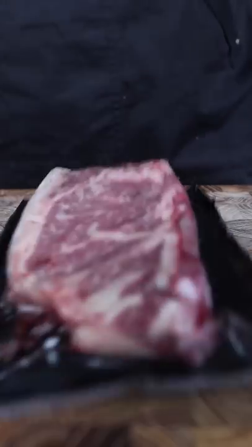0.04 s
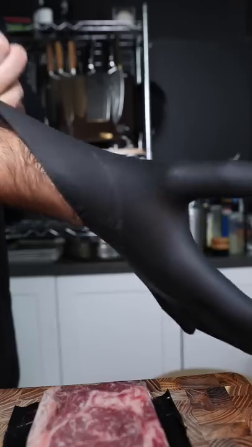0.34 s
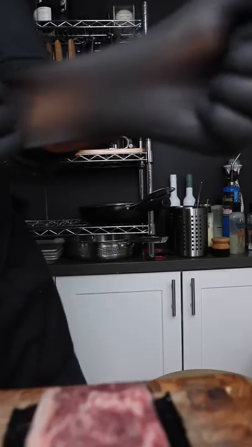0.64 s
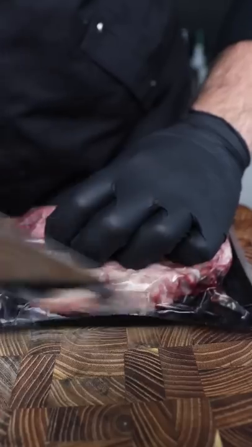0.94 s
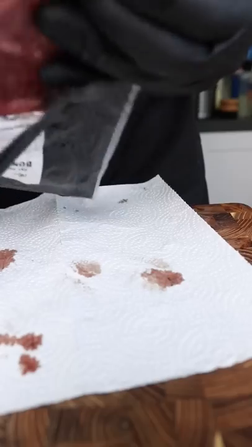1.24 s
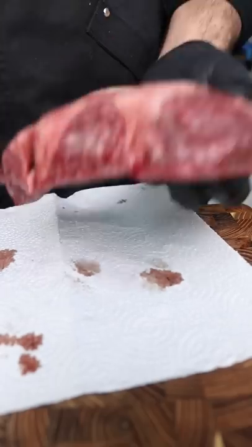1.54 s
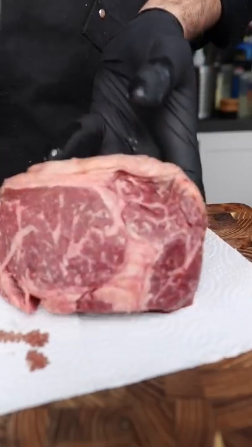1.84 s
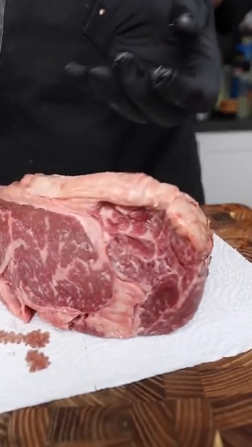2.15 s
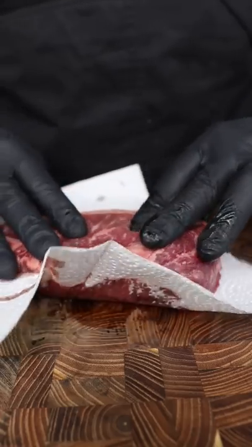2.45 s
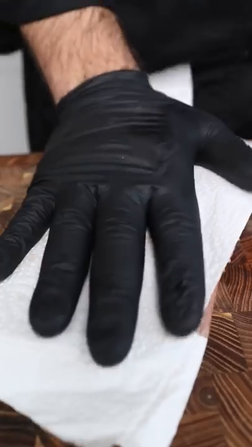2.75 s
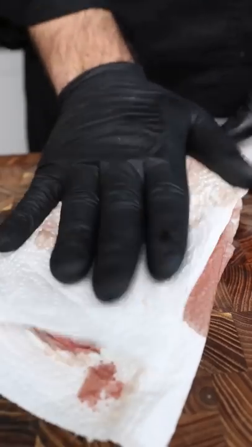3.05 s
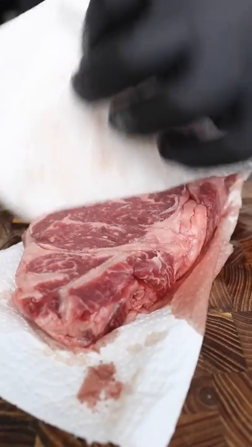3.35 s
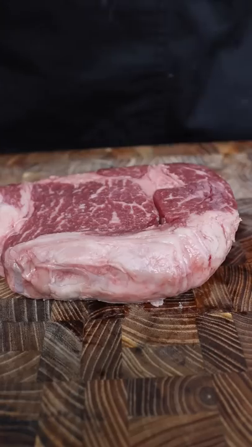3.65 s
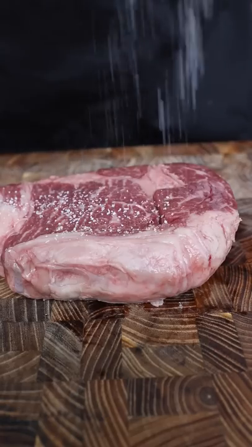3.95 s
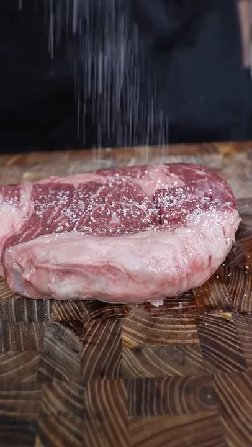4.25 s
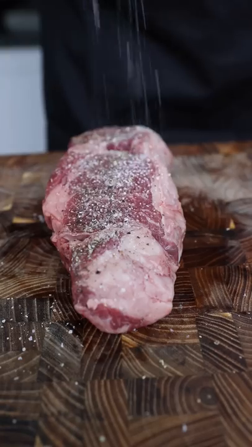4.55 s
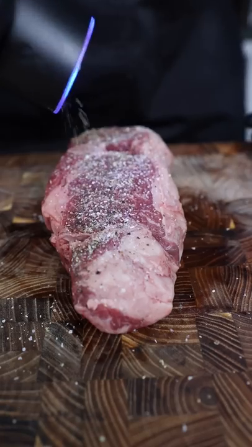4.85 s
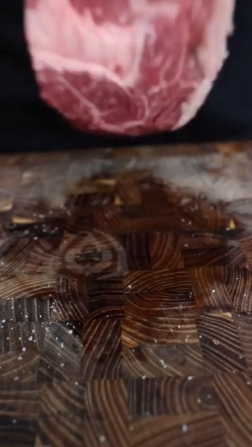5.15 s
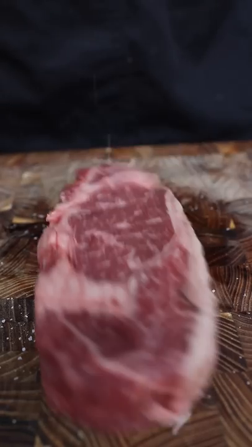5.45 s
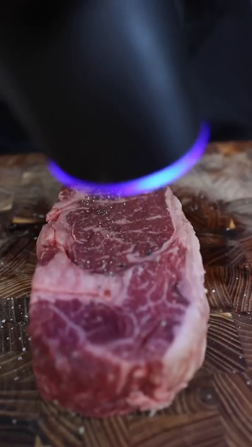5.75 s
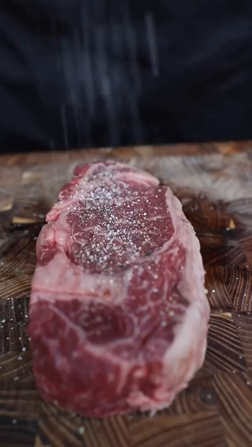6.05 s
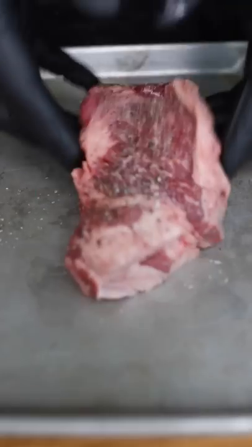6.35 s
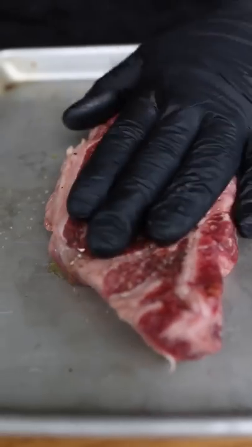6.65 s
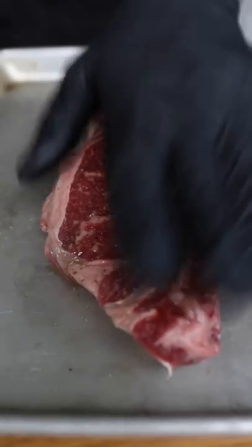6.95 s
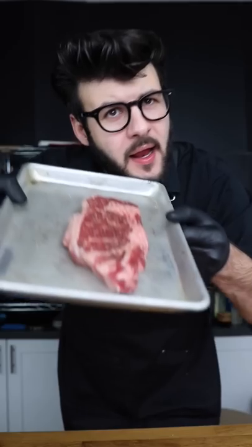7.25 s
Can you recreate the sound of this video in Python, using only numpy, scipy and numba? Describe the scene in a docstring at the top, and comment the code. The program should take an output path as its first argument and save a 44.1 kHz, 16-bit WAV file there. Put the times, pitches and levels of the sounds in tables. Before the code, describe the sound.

Close kitchen handwork: meat smacks a board, rubber snaps, plastic tears, a pepper mill crunches twice, and the meat is patted on metal.

```python
"""A steak is prepared close by in a small kitchen, in short shots joined by hard cuts, over a fridge's hum.
First it slaps onto a wooden board and excites the board's modes. A rubber glove snaps on, the vacuum bag
is slit, and the wet meat peels out. Paper towel pats it dry with a rustle of friction, salt falls in tiny
impacts, and an electric pepper mill grinds twice, its housing resonating to the fractures.
Last, the meat is laid on a metal tray and patted three times, so that the tray rings."""
import sys
import numpy as np
from scipy import signal
from scipy.fft import rfft, irfft, next_fast_len
from scipy.io import wavfile
from numba import njit

SR = 44100
rng = np.random.default_rng(int(sys.argv[2]) if len(sys.argv) > 2 else 0)


def wav_record(signal):
    """Record a signal, one row per channel, as 16-bit PCM in the file named by sys.argv[1]."""
    frames = np.transpose(np.atleast_2d(signal))
    bounded = np.clip(frames, -1, 1)
    # unit amplitude maps onto the largest positive 16-bit level
    quanta = np.round(bounded * 32767).astype(np.int16)
    wavfile.write(sys.argv[1], SR, quanta)


N = 331023
T = np.arange(N) / SR

# shot boundaries (time [s])
CUT_TIMES = [0, .46, 2.19, 2.552, 5.018, 6.02, 6.704, 7.105, 7.6]
# rubber and plastic film snapping (time [s], level [dB], length [s], tilt [dB/octave])
FILM_SNAPS = [(0.2406, -17, 0.00039, 8.5), (0.677, -40.5, 0.0017, -3.5), (0.7182, -18.5, .001, -2),
              (0.7208, -6, .0012, -3.5), (0.7238, -5, .0013, 2.5), (0.8877, -13, 0.00038, 4.5),
              (0.9292, -13, 0.00081, 5), (0.959, -23, 0.00086, 15), (1.012, -21.5, 0.0011, 6.5),
              (1.131, -35, 0.0016, -2), (1.4897, -34, 0.001, -0.5)]


def amp(db):
    """Amplitude ratio of a level in decibels."""
    return 10 ** (np.asarray(db) / 20)


def unit(x):
    """Normalisation to an rms of 1."""
    return x / np.sqrt(np.mean(x ** 2) + 1e-20)


def add(out, start_s, x):
    """Superposition: x is added into out from a given time."""
    i = int(round(start_s * SR))
    x = x[max(-i, 0):N - i]
    out[max(i, 0):max(i, 0) + len(x)] += x


def in_shot(s, x):
    """Truncation: a sound that starts at time s ends no later than the next cut."""
    next_cut = min(cut for cut in CUT_TIMES if cut > s)
    return x[:int((next_cut - s) * SR)]


def strokes(rows, attack_s, release_s):
    """Incoherent sources add in power: the joint envelope of movements that swell, hold and decay."""
    power = np.zeros(N)
    for s, length_s, db in rows:
        release = np.exp(-np.clip((T - length_s) / release_s, 0, 20))
        gain = amp(db) * np.minimum(T / attack_s, 1) * release
        add(power, s, in_shot(s, gain ** 2))
    return np.sqrt(power)


def colour(x, points, tilt_db=0):
    """Minimum-phase filter through (frequency [Hz], gain [dB]) points, tilted per octave; output rms 1."""
    size = 2 * next_fast_len(len(x) // 2 + 1)
    octave = np.log2(np.maximum(np.fft.rfftfreq(size, 1 / SR), 1))
    hz, db = np.transpose(points)
    octaves_outside = np.abs(octave - np.clip(octave, np.log2(hz[0]), np.log2(hz[-1])))
    tilt = tilt_db * np.maximum(octave - np.log2(hz[1]), 0)
    gain_db = np.interp(octave, np.log2(hz), db) + tilt - 20 * octaves_outside
    cepstrum = irfft(gain_db * np.log(10) / 20)
    cepstrum[1:size // 2] *= 2  # folding the cepstrum makes the filter causal
    cepstrum[size // 2 + 1:] = 0
    return unit(irfft(rfft(x, size) * np.exp(rfft(cepstrum)))[:len(x)])


def grains(per_s, spread_db, bed):
    """Shot noise: random clicks of very unequal size over a bed of smooth friction noise."""
    sizes = amp(spread_db * np.minimum(rng.exponential(size=N), 4))
    clicks = (rng.random(N) < per_s / SR) * sizes * rng.choice([-1, 1], N)
    return unit(unit(clicks) + bed * rng.standard_normal(N))


@njit
def resonate(x, hz, damping):
    """Driven damped oscillator: a band-pass whose centre may move; damping is bandwidth over centre."""
    y, band_state, low_state = np.empty(len(x)), 0., 0.
    for i in range(len(x)):
        g = np.tan(np.pi * hz[i] / SR)
        y[i] = (band_state + g * (x[i] - low_state)) / (1 + g * (g + damping))
        band_state = 2 * y[i] - band_state
        low_state += 2 * g * y[i]
    return y


def reflections(x, ring_s, ring_db):
    """Interference with close reflections and dense short resonances ripples the spectrum."""
    t = np.arange(2048) / SR
    ring = rng.standard_normal(len(t)) * np.exp(-t / ring_s)
    return unit(x + amp(ring_db) * signal.fftconvolve(x, ring / np.linalg.norm(ring))[:len(x)])


def room_tail():
    """Diffuse field: the kitchen's impulse response is noise decaying at its own rate in each band."""
    # (frequency [Hz], decay time T60 [s], level [dB])
    bands = [(101.14, 1, -12), (300, 0.14, -3.5), (900, .42, -10), (2500, 0.35, -13), (6500, 0.38, -13),
             (12800, 0.25, -16)]
    t = np.arange(SR // 2) / SR
    octave = np.log2(np.maximum(np.fft.rfftfreq(len(t), 1 / SR), 1))
    hz, t60s, dbs = np.transpose(bands)
    noise, tail = rfft(rng.standard_normal(len(t))), 0
    for share, t60, db in zip(np.eye(len(hz)), t60s, dbs):
        band = irfft(noise * np.interp(octave, np.log2(hz), share), len(t))
        decay = np.exp(-np.log(1000) * t / t60) * (1 - np.exp(-t / 0.00048))
        tail = tail + amp(db) * band * decay / np.linalg.norm(decay)
    return tail


def burst(length_s, spectrum, tilt_db, fizz_db, fizz_s, room_db):
    """Air expelled between closing surfaces: a noise pulse, fizz and tail. Returns lead time and sound."""
    lead_s = 4 * length_s
    t = np.arange(SR // 2) / SR - lead_s
    width = np.where(t < 0, .7, 1) * length_s
    shape = np.exp(-(t / width) ** 2 / 2) + amp(fizz_db) * (t > 0) * np.exp(-np.abs(t) / fizz_s)
    puff = colour(shape * rng.standard_normal(len(t)), spectrum, tilt_db)
    tail = colour(room_tail(), spectrum, tilt_db)
    tail = np.pad(tail, (int(lead_s * SR), 0))[:len(t)]
    return lead_s, (puff + amp(room_db) * tail) * np.sqrt(np.mean(shape ** 2))


def impacts(rows, spectrum, modes, settle_s, fizz_db, wobble_db, wobble_s, room_db):
    """Impact excitation: a smack, then the soft weight wobbles and rings the modes of the body below."""
    # wobbling meat (frequency [Hz], gain [dB])
    flesh = [(45, -2), (95, -10), (150, -2), (200, 2), (400, -0.5), (700, -13.5), (1200, -18.5),
             (2500, -29)]
    out, t = np.zeros(N), np.arange(SR // 2) / SR
    hz, db, t60 = np.transpose(modes)[:, :, None]
    decay = np.exp(-np.log(1000) * t / t60)
    for s, smack_db, contact_s, tilt_db, thud_db, thud_hz in rows:
        lead_s, smack = burst(contact_s, spectrum, tilt_db, fizz_db, fizz_s=0.0065, room_db=room_db)
        add(out, s - lead_s, in_shot(s, amp(smack_db) * smack))
        # modes near the thud's centre are driven hardest
        share = amp(db + 10.4 * np.exp(-(np.log2(hz / thud_hz) / 0.25) ** 2))
        detune = 1 + .015 * rng.standard_normal(hz.shape)
        phase = 2 * np.pi * (hz * detune * t + rng.random(hz.shape))
        ring = np.sum(share * np.sin(phase) * decay, axis=0) / np.linalg.norm(share)
        wobble = amp(wobble_db) * colour(rng.standard_normal(len(t)), flesh) * np.exp(-t / wobble_s)
        onset = 1 - np.exp(-t / settle_s)
        add(out, s, in_shot(s, 2 * amp(thud_db) * (ring + wobble) * onset))
    return out


def board():
    """Damped modes of a wooden board, excited as wet meat meets it or a hand meets the meat."""
    # (time [s], smack level [dB], contact [s], tilt [dB/octave], thud level [dB], thud centre [Hz])
    slaps = [(.0078, -8.5, 0.0016, 0.5, -17.5, 380), (.0148, -7.5, 0.0022, 1.5, -26, 204),
             (.0252, -5.5, 0.0016, 1, -39, 400), (.039, -47.5, 0.0027, 3.5, -30, 398),
             (2.745, -38.5, 0.0096, -0.5, -47, 200), (3.058, -24.5, 0.003, -1.5, -43, 132),
             (3.687, -37.5, 0.0032, -6, -40.5, 283), (3.721, -45, 0.0084, 2.5, -55, 505),
             (5.414, -51, 0.0026, 1, -44, 169), (5.421, -33, 0.00077, 0.5, -45.5, 200),
             (5.478, -45, 0.02, 7.5, -45, 170)]
    # (frequency [Hz], gain [dB])
    smack_spectrum = [(60, -15.5), (200, 3), (700, 3.5), (1500, 3.5), (3000, -1.5), (5500, -4.5),
                      (8500, -3), (10500, -11.5), (15000, -15.5)]
    # (frequency [Hz], relative level [dB], decay time T60 [s])
    wood_modes = [(60.5, -1, 0.1), (124.8, -7, 0.35), (172.8, -2, 0.17), (224, -7, .15), (295, -5.5, 0.12),
                  (424, -6.5, 0.074), (638, -10.5, 0.051), (747, -2.5, .1), (1113, -7, 0.1)]
    return impacts(slaps, smack_spectrum, wood_modes, settle_s=0.001, fizz_db=-27,
                   wobble_db=-12, wobble_s=0.061, room_db=-7)


def counter():
    """Forced vibration: the counter sways at low frequency when weight comes down on it."""
    # (time [s], length [s], level [dB])
    loads = [(0, 0.079, -39.5), (.19, 0.012, -47), (2.745, 0.041, -41), (3.04, 0.054, -35.5),
             (5.41, .08, -54), (5.51, .04, -41), (5.62, 0.11, -45), (6.35, 0.18, -48.5), (6.515, .05, -42),
             (6.77, 0.058, -44), (6.99, .06, -40.5)]
    # (frequency [Hz], gain [dB])
    sway_spectrum = [(14, 8), (24, -1), (34, 11), (45, -5.5), (60, -14.5), (100, -19.5), (200, -22)]
    sway = colour(rng.standard_normal(N), sway_spectrum)
    return sway * strokes(loads, attack_s=0.0056, release_s=0.066)


def air_and_fridge():
    """Broadband room noise under the wavering line spectrum of a fridge, both fainter in the last shot."""
    # (frequency [Hz], gain [dB])
    air_spectrum = [(25, -13), (55, -2.5), (90, -15), (200, -15.5), (310, -11), (420, -19), (520, -17),
                    (800, -21), (1600, -27), (3000, -32.5), (8000, -33.5), (15500, -44)]
    # (frequency [Hz], level [dB])
    fridge_tones = [(59.2, -62.5), (310, -63.5), (415, -63)]
    hum = 0
    for hz, db in fridge_tones:
        waver = unit(resonate(rng.standard_normal(N), np.full(N, 1. * hz), damping=8 / hz))
        hum = hum + amp(db) * (np.sin(2 * np.pi * hz * T) + .3 * waver)
    air = colour(rng.standard_normal(N), air_spectrum) * amp(-60.5)
    return (air + hum) * np.where(T > CUT_TIMES[-2], amp(-12), 1)


def snaps():
    """Sudden release of tension: taut film lets go in a broadband pulse of a millisecond or two."""
    # (frequency [Hz], gain [dB])
    film_spectrum = [(60, -21.5), (170, -8.5), (330, 4), (900, 1), (1800, 4), (3200, 2.5), (5500, 1),
                     (8000, -0.5), (10500, -11), (15000, -13)]
    out = np.zeros(N)
    for s, db, length_s, tilt_db in FILM_SNAPS:
        lead_s, crack = burst(length_s, film_spectrum, tilt_db, fizz_db=-20, fizz_s=0.0081, room_db=-8.5)
        add(out, s - lead_s, in_shot(s, amp(db) * crack))
    return out


def glove_on():
    """The stretched cuff resonates after the first snap; then rubber drags over skin with friction."""
    # (time [s], length [s], level [dB])
    pulls = [(.335, .095, -37.5), (.55, .11, -58), (.672, .04, -48), (.695, .022, -35.5)]
    # (frequency [Hz], gain [dB])
    rubber_spectrum = [(100, -20), (200, -7), (330, -1.5), (480, -0.5), (1000, -6), (1600, -6), (3200, -10),
                       (5500, -7.5), (8500, -11.5), (15000, -31)]
    cuff_s, cuff_hz, cuff_db = FILM_SNAPS[0][0], 5930., -34
    rub = colour(grains(per_s=6000, spread_db=2.5, bed=1), rubber_spectrum)
    zing = unit(resonate(rng.standard_normal(N), np.full(N, cuff_hz), damping=.13))
    return (rub * strokes(pulls, attack_s=0.01837, release_s=0.032)
            + zing * strokes([(cuff_s, .005, cuff_db)], attack_s=0.0039, release_s=0.023))


def bag():
    """Film tears in tiny steps; its resonance falls as the slit opens and the tension goes."""
    # course of the slit (time [s], tearing level [dB], film resonance [Hz])
    slit = [(.882, -38, 3903), (.9, -36.5, 3880), (0.932, -37, 3600), (.968, -39.5, 3046),
            (.991, -26.5, 2400), (1.05, -35, 800), (1.11, -44, 340), (1.15, -69.5, 250)]
    # the bagged steak drags on the board (time [s], length [s], level [dB])
    drags = [(.92, 0.016, -36.5), (.99, 0.1, -37)]
    # spectra of the two (frequency [Hz], gain [dB])
    tear_spectrum = [(350, -8), (600, -25), (863, -10), (1480, -19), (2400, -0.5), (2940, -8.5), (5320, -5),
                     (10300, -21), (13300, -10), (15000, -23.5)]
    drag_spectrum = [(60, -28.5), (130, -7), (195, 5.5), (300, 0.5), (500, -6.5), (900, -15.5), (2000, -40)]
    s, db, hz = np.transpose(slit)
    centre = np.interp(T, s, hz)
    tear = grains(per_s=3500, spread_db=3.8, bed=.45)
    ring = unit(resonate(tear, centre, damping=0.7) / np.sqrt(centre))
    slack_octaves = np.log2(1000 / centre)
    film = colour(tear, tear_spectrum) + ring * amp(-3 + 7 * slack_octaves)  # slack film booms more
    pull = amp(np.interp(T, s, db, left=-200, right=-200))
    drag = colour(grains(per_s=410.4, spread_db=2.9, bed=0.86), drag_spectrum)
    return film * pull + drag * strokes(drags, attack_s=.018, release_s=.04)


def peeling():
    """Adhesion fails point by point: wet meat unsticks from film and gloves in sparse, faint ticks."""
    # (time [s], length [s], level [dB])
    peels = [(1.12, .05, -55), (1.24, .55, -73)]
    # (frequency [Hz], gain [dB])
    tick_spectrum = [(700, -4), (1600, 5), (4500, -3), (7000, -15), (12000, -12.5)]
    ticks = colour(grains(per_s=45, spread_db=3.5, bed=.05), tick_spectrum)
    return reflections(ticks, ring_s=0.0025, ring_db=-2.5) * strokes(peels, attack_s=.01, release_s=0.094)


def brief_resonances():
    """Transient resonance: a fold or a wet pocket gives way and briefly sounds its own frequency; the row at
    6.52 s is a short, broad burst of noise, and the last two rows are short rings of the metal tray as it is
    patted."""
    # (time [s], level [dB], length [s], resonance [Hz], bandwidth over centre [1])
    resonances = [(1.194, -35, 0.001, 3650, 0.47), (1.2, -44, 0.011, 1540, 1.1),
                  (1.25, -58, 0.023, 1600, 0.89), (1.25, -47, .00068, 4190, .5),
                  (1.302, -51, 0.0015, 1470, 0.63), (1.717, -56.5, 0.0094, 1890, .54),
                  (2.367, -51.5, .003, 8350, .21), (2.834, -39, 0.00053, 8650, .2),
                  (2.886, -48, 0.00073, 8600, .18), (4.339, -62.5, .053, 784, 0.069),
                  (5.419, -46.5, 0.0087, 2220, 0.5), (5.46, -52, 0.025, 868, 0.2),
                  (5.835, -22, .0015, 7400, 0.34), (6.334, -54, .0031, 1550, .43),
                  (6.496, -51, 0.0021, 1554, 0.22), (6.5225, -50.5, 0.0015, 3540, 3.6),
                  (6.775, -20, 0.0008, 3000, .06), (6.999, -29, 0.002, 2760, 0.24)]
    out, t = np.zeros(N), np.arange(SR // 2) / SR - 1 / 4
    for s, db, length_s, hz, damping in resonances:
        shape = np.exp(-(t / length_s) ** 2 / 2)
        centre = np.full(len(t), 1. * hz)
        pop = shape * rng.standard_normal(len(t))
        for _ in range(2):
            pop = resonate(pop, centre, 1. * damping)
        add(out, s + t[0], amp(db) * unit(pop) * np.sqrt(np.mean(shape ** 2)))
    return out


def paper_towel():
    """Friction of fibres: the towel rustles in the hands, wipes the meat and flutters as it lifts."""
    # movements (time [s], length [s], level [dB])
    rustles = [(1.66, 0.026, -58), (2.2, .35, -54), (2.71, .08, -54.5), (2.9, 0.44, -61.5),
               (3.23, 0.19, -60), (5.13, 0.47, -71.5), (5.45, 0.047, -52), (6.04, .28, -69)]
    wipes = [(2.978, 0.19, -44.5), (3.3, 0.29, -57.5)]
    lifts = [(3.05, 0.27, -51.5), (3.22, 0.062, -49.5)]
    # their spectra (frequency [Hz], gain [dB])
    rustle_spectrum = [(200, 3), (600, -0.5), (1500, 2.5), (2800, 0), (5000, -0.5), (8500, -4.5),
                       (10500, -9.5), (13000, -9), (16000, -24)]
    wipe_spectrum = [(300, -1.5), (600, -16), (850, 2), (1050, 3), (1400, -2.5), (2100, -2), (3000, -21),
                     (6000, -50)]
    lift_spectrum = [(50, -5), (130, 6.5), (190, 8.5), (330, 3), (560, 9.5), (900, -5), (2000, -3),
                     (4000, -34)]
    crackle = grains(per_s=1300, spread_db=5.3, bed=1.6)
    rub = reflections(grains(per_s=1000, spread_db=3, bed=0.75), ring_s=0.018, ring_db=9)
    flutter = grains(per_s=300, spread_db=2.6, bed=0.49)
    return (colour(crackle, rustle_spectrum) * strokes(rustles, attack_s=0.042, release_s=0.084)
            + colour(rub, wipe_spectrum) * strokes(wipes, attack_s=0.009, release_s=0.05)
            + colour(flutter, lift_spectrum) * strokes(lifts, attack_s=0.071, release_s=0.19))


def glove_slides():
    """Sliding friction of gloves over towel, meat and tray gives a grainy broadband noise."""
    # (time [s], length [s], level [dB])
    slides = [(2.552, 0.58, -65.5), (3.14, 0.59, -59.5), (3.26, 0.36, -54.5), (6.35, 0.027, -50),
              (6.8, 0.084, -51.5), (7.01, 0.1, -55), (7.105, 0.39, -53.5), (7.32, 0.11, -52)]
    # (frequency [Hz], gain [dB])
    slide_spectrum = [(100, 0), (230, -2.5), (400, -5.5), (1060, -8.5), (3000, -10), (7000, -5),
                      (10500, -10), (15500, -14.5)]
    friction = colour(grains(per_s=2100, spread_db=3, bed=0.81), slide_spectrum)
    return friction * strokes(slides, attack_s=0.013, release_s=0.024)


def salt():
    """Many tiny impacts merge into a hiss that thins out and pulses as the fingers rub."""
    # coarse crystals that bounce on their own (time [s], level [dB])
    crystals = [(3.889, -52.5), (4.065, -51), (4.104, -53.5), (4.2515, -48), (6.104, -52.5)]
    # (frequency [Hz], gain [dB])
    salt_spectrum = [(2000, -8), (3500, -10), (4600, -2.5), (5800, -0.5), (7500, -7), (9000, -4.5),
                     (10800, -8.5), (12500, -11), (15500, -17)]
    start_s, end_s = 3.65, 4.7
    rub_hz, rub_db, fade_db_per_s = 4.8, 1, 19.5
    t = T - start_s
    stream = reflections(grains(per_s=1400, spread_db=4.6, bed=.45), ring_s=.0007, ring_db=-10)
    flow = strokes([(start_s, end_s - start_s, -54.5)], attack_s=0.036, release_s=.04)
    flow *= amp(rub_db * np.sin(2 * np.pi * rub_hz * t) - fade_db_per_s * t)
    bounces = strokes([(s, .001, db) for s, db in crystals], attack_s=.0004, release_s=0.0018)
    return colour(stream, salt_spectrum) * flow + colour(rng.standard_normal(N), salt_spectrum) * bounces


def pepper_mill():
    """Brittle fracture between the burrs drives the housing's resonances, harder when a corn bursts."""
    # one row a run (start [s], end [s])
    spans = [(4.734, 5.0178), (5.6515, 6.0185)]
    # one row a run (level [dB], swell [dB/s], housing ring over crunch [dB], its change [dB/s],
    # change of the upper modes [dB/s])
    runs = [(-34, 3.5, -7, -50.5, 34), (-31.5, 5.5, -0.5, 6.5, 0)]
    # one table a run (frequency [Hz], gain [dB])
    crunch_spectra = [
        [(250, -9.5), (550, -15.5), (800, 1.5), (1300, 1), (2000, 2), (2600, 1.5), (3600, -4.5), (5000, -2),
         (9100, -1), (10300, -7.5), (15500, -14)],
        [(250, -11.5), (500, -10), (850, 3), (1300, 4), (2150, -0.5), (2500, 1.5), (3250, 0), (3700, -5.5),
         (4400, -1.5), (5000, -11), (5600, -2), (8500, 0.5), (10500, -9.5), (15000, -16.5)],
    ]
    # one table a run (frequency [Hz], bandwidth [Hz], level over crunch [dB])
    upper_modes = [
        [(2420, 210, -21), (3090, 84, -39), (3960, 460, -29)],
        [(2500, 160, -14.5), (3040, 320, -20.5), (4800, 490, -12)],
    ]
    # the biggest peppercorns burst (time [s], relative level [dB])
    bursting_corns = [(4.738, -3), (4.788, 1), (5.653, 6), (5.68, 10), (5.737, 1), (5.821, 12), (5.859, 8),
                      (5.883, -9), (5.917, -10), (6.01, -2)]
    ring_hz, rise_hz, rise_s = 1512, 105, 0.16  # the ring climbs as each run gets going
    out, cracks = np.zeros(N), np.zeros(N)
    for s, db in bursting_corns:
        add(cracks, s, amp(db) * np.exp(-T[:2048] / .003))
    for (start, end), run, spectrum, modes in zip(spans, runs, crunch_spectra, upper_modes):
        run_db, swell_db_per_s, ring_db, ring_db_per_s, upper_db_per_s = run
        on = (T >= start) & (T <= end)
        t = T[on] - start
        splinters = grains(per_s=3000, spread_db=4, bed=1)
        spray = reflections(splinters * (1 + .3 * cracks), ring_s=.006, ring_db=-6)
        crunch = unit(colour(spray, spectrum)[on])
        for mode_hz, width_hz, db in modes:
            mode = resonate(splinters[on], np.full(len(t), 1. * mode_hz), width_hz / mode_hz)
            crunch += amp(db + upper_db_per_s * t) * unit(mode)
        hz = ring_hz + rise_hz * (1 - np.exp(-t / rise_s))
        ring = unit(resonate((splinters * (1 + 1.2 * cracks))[on], hz, damping=.03))
        out[on] += (crunch + ring * amp(ring_db + ring_db_per_s * t)) * amp(run_db + swell_db_per_s * t)
    return out


def tray():
    """Plate modes of a metal tray, excited as the meat lands on it and is patted."""
    # (time [s], smack level [dB], contact [s], tilt [dB/octave], thud level [dB], thud centre [Hz])
    pats = [(6.35, -34.5, 0.0013, -2.5, -46, 299), (6.39, -48.5, 0.0094, 2.5, -41, 252),
            (6.6188, -19.5, 0.0015, -1, -28.5, 201), (6.768, -33, 0.0038, -2.5, -38, 298),
            (6.7722, -17.5, 0.00034, 6, -36, 300), (6.7768, -20.5, 0.0011, -1, -39, 292),
            (6.79, -34.5, 0.008, -8, -30.5, 306), (6.993, -28, 0.0025, -1.5, -39.5, 220),
            (7.0, -28, 0.0016, -0.5, -40.5, 200)]
    # (frequency [Hz], gain [dB])
    wet_spectrum = [(100, -23), (500, -6), (1500, 3), (3000, 3), (5500, -0.5), (8500, 0), (10500, -7),
                    (15000, -7.5)]
    # (frequency [Hz], relative level [dB], decay time T60 [s])
    metal_modes = [(42.7, 2.5, 0.22), (157.4, 7.5, 0.2), (208.7, 2.5, 0.21), (303.5, 2, 0.2),
                   (359, -7, 0.2), (463, 12.5, 0.084), (721, 1, .09), (1093, -19, 0.048), (1800, -4, 0.15),
                   (2930, -28, 0.23)]
    return impacts(pats, wet_spectrum, metal_modes, settle_s=0.00097, fizz_db=-14,
                   wobble_db=-13, wobble_s=0.073, room_db=-8)


def kitchen(x):
    """Reverberation: cupboards and walls return a dense tail, which ends with each shot."""
    out, tail = np.zeros(N), room_tail()
    for start, end in zip(CUT_TIMES, CUT_TIMES[1:]):
        shot = (T >= start) & (T < end)
        out[shot] = signal.fftconvolve(x[shot], tail)[:shot.sum()]
    return out


def scene():
    """Superposition: smacks and snaps carry their own tails; the handwork shares one reverberation."""
    # near-silent gaps between shots (start [s], end [s])
    gaps = [(.46, .563), (2.188, 2.213)]
    blows = board() + tray()
    handwork = glove_on() + bag() + brief_resonances() + peeling() + paper_towel()
    handwork += counter() + glove_slides() + salt() + pepper_mill()
    mix = blows + snaps() + handwork + kitchen(amp(-0.5) * handwork) + air_and_fridge()
    for start, end in gaps:
        mix[(T > start) & (T < end)] *= amp(-30)
    return mix[None]


def record(dry):
    """Clipping and band limiting: the hardest peaks are flattened, then the top of the treble is cut."""
    low_pass = signal.ellip(10, .2, 70, 15950, fs=SR, output="sos")
    return signal.sosfilt(low_pass, np.clip(dry, -.95, .95))


dry = scene()
out = record(dry)
wav_record(out)
```